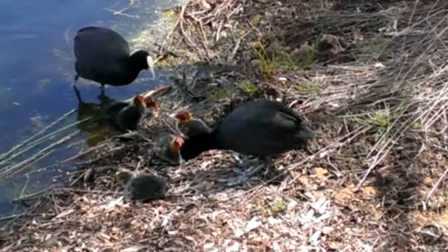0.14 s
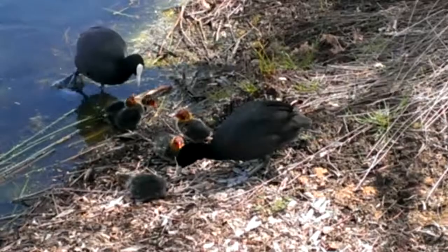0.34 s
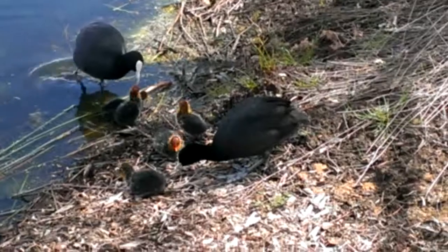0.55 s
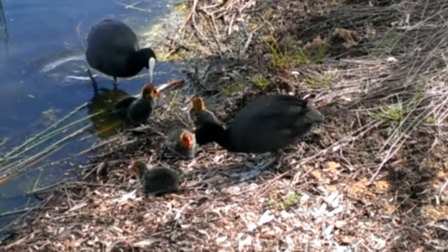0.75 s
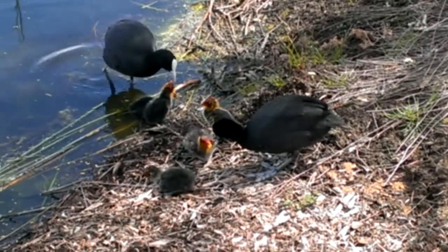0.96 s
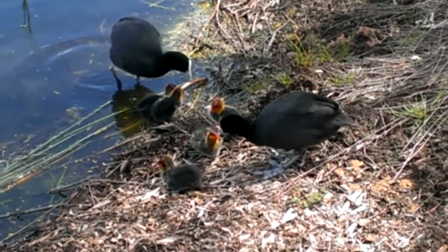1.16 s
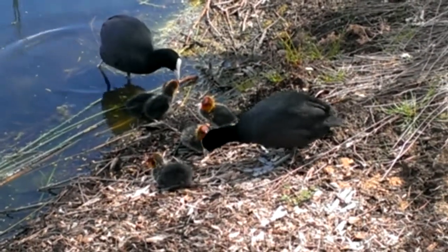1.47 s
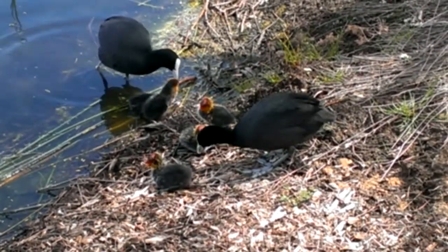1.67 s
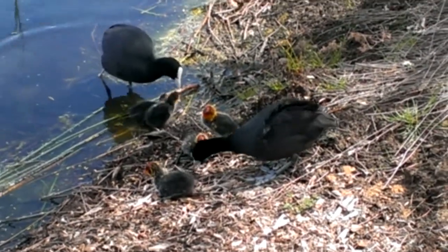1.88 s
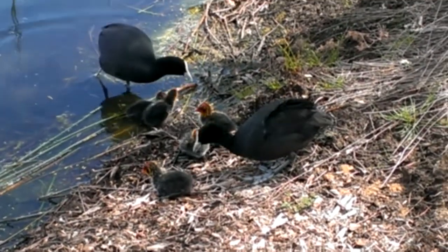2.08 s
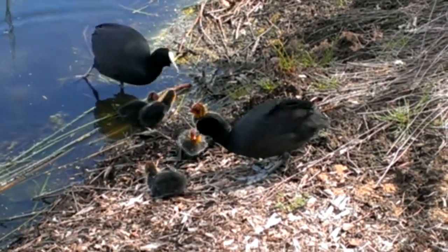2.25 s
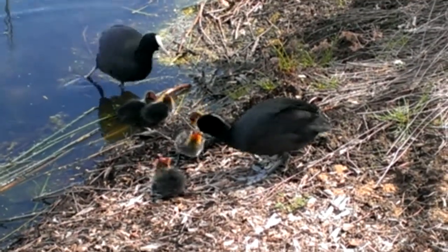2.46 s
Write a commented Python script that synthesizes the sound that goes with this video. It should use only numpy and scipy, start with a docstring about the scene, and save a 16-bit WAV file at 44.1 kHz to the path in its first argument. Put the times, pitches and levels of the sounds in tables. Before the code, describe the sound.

Coot chicks beg at a pond edge: a rough, wavering, nasal squeal at about 0.3-0.5 s and a cleaner one from 2.4 s to the end. After 0.1 s of silence, low wind buffets thump the stereo microphone, easing around 0.4-1.0 s, then returning. Dry stalks crackle brightly on the left, loudest at 0.4-1.0 s, with sparse faint ticks afterwards. Faint outdoor hiss lies underneath.

```python
"""Chicks begging at a windy pond

Coot chicks beg with short wavering squeals: stacks of harmonics coloured by throat and beak.
Dry stalks crackle to the left: ringing ticks and snaps over a swish of noise.
Wind buffets the two microphone ports in low lumps: noise bands that reach higher in a stronger push.
A faint outdoor hiss of coloured noise lies underneath."""
import sys
import numpy as np
from scipy import signal
from scipy.fft import rfft, irfft
from scipy.io import wavfile
from scipy.ndimage import uniform_filter1d

SR = 44100
rng = np.random.default_rng(int(sys.argv[2]) if len(sys.argv) > 2 else 0)


def file_out(sig):
    """Save sig as 16-bit WAV at sys.argv[1]."""
    # one column per channel
    cols = np.atleast_2d(sig).T
    # limit, then scale
    lim = np.clip(cols, -1, 1)
    pcm = np.round(lim * 32767).astype(np.int16)
    wavfile.write(sys.argv[1], SR, pcm)


N = 115542  # length in samples


def amp(db):
    """Turn decibels into a gain."""
    return 10 ** (np.asarray(db) / 20)


def unit(x):
    """Scale a sound to an rms of 1."""
    return x / np.sqrt(np.mean(x ** 2) + 1e-20)


def in_time(rows):
    """Read a table at every sample: straight lines join its rows, one curve per column."""
    s, *columns = np.transpose(rows)
    return [np.interp(np.arange(N) / SR, s, c) for c in columns]


def at_hz(points, hz):
    """Read a spectrum table at any frequency, along a logarithmic frequency scale."""
    table_hz, values = np.array(points).T
    return np.interp(np.log(hz), np.log(table_hz), values)


def drift(rate):
    """Slow random wandering around 0 with a spread of about 1; a higher rate [Hz] wanders faster."""
    step = 20  # samples between the computed points
    r = np.exp(-2 * np.pi * rate * step / SR)
    noise = rng.standard_normal(N // step + 1002)
    slow = signal.lfilter([1], [1, -2 * r, r * r], noise)[1000:]  # skip the filter's start
    return np.interp(np.arange(N) / step, np.arange(len(slow)), unit(slow))


def sides(pan_db):
    """Split a left-minus-right difference in dB into a left and a right level."""
    return np.array([pan_db / 2, -pan_db / 2]).reshape(2, -1)


def pair(likeness):
    """Stereo white noise: the sides are unrelated at likeness 0 and the same at 1."""
    mid, side = rng.standard_normal((2, N))
    c = np.clip(likeness, 0, 1)
    return (np.sqrt(1 + c) * mid + np.sqrt(1 - c) * side * [[1], [-1]]) / np.sqrt(2)


def colour(x, points):
    """Filter a sound by the levels of a spectrum table."""
    hz = np.maximum(np.arange(N // 2 + 1) * SR / N, 1)
    return irfft(rfft(x) * amp(at_hz(points, hz)), N)


def ring(clicks, hz, cycles):
    """Soft bursts: each click passes two short resonances; each loses 60 dB in the given cycles."""
    r, w = amp(-60 * hz / (cycles * SR)), 2 * np.pi * hz / SR
    a = [1, -2 * r * np.cos(w), r * r]
    once = signal.lfilter([0, np.sin(w)], a, clicks + 1e-18)
    return signal.lfilter([(1 - r) * np.e, 0, -(1 - r) * np.e], a, once)


def air():
    """Faint wide hiss of the open pond: coloured noise, only partly alike on the two sides."""
    # level of the hiss: (time [s], level [dB])
    air_level = [(.14, -46.5), (.34, -47), (.4, -40.5), (1.05, -42.5), (1.2, -53), (2.4, -57.5)]
    # hiss spectrum: (frequency [Hz], relative level [dB per Hz])
    air_colour = [(300, 15.5), (700, 17), (1500, 11), (2500, 9.5), (4000, 6.5), (16000, -0.5)]
    db, = in_time(air_level)
    return amp(db) * unit(colour(pair(0.39), air_colour))


def wind():
    """Lumpy pressure at each port; the stronger the push, the higher the edge of its rumble."""
    # wind strength before the lumps: (time [s], level [dB], left minus right [dB])
    gust = [(.12, -26, -2), (.33, -25, -10), (.44, -32.5, 5), (.64, -38, 1), (.9, -35.5, -6.5),
            (1.2, -24.5, -2.5), (1.6, -30.5, -8.5), (2.0, -25, -11), (2.33, -27.5, -6), (2.46, -44, 11.5),
            (2.62, -27, -0.5)]
    # strong buffets before their flutter:
    # (start [s], level [dB], left minus right [dB], time from start until the fall begins [s])
    buffets = [(0.128, -18.5, 4, 0.02), (0.16, -17.5, -2.5, 0.025), (0.225, -20, -9.5, 0.029),
               (0.268, -11.5, -11, 0.022), (0.294, -14.5, -7, 0.025), (0.332, -22.5, -7, 0.02),
               (0.705, -29, -10, 0.045), (0.852, -23.5, -11, 0.021), (1.075, -17, -5, 0.037),
               (1.157, -14.5, 2.5, 0.021), (1.186, -24, -0.5, 0.042), (1.35, -21.5, 3, 0.033),
               (1.453, -21.5, -11, 0.034), (1.566, -22, -12.5, 0.014), (1.674, -24, -12, 0.018),
               (1.777, -20.5, -7.5, 0.019), (1.902, -17, -5.5, 0.033), (2.007, -19.5, 0.5, 0.017),
               (2.046, -21.5, 1, 0.036), (2.129, -19.5, 8, 0.017), (2.183, -17.5, 11, 0.036),
               (2.226, -20, -5.5, 0.051), (2.289, -23, -12.5, 0.057), (2.346, -17.5, -3.5, 0.022),
               (2.401, -25.5, 5.5, 0.039), (2.563, -24, 8, 0.022)]
    # sharp knocks: (time [s], jump of the edge [octaves])
    knocks = [(0.17, 1.3), (0.272, 0.88), (.296, 1.14), (1.166, 0.48), (1.786, 0.27), (1.916, 0.73),
              (2.058, 0.89), (2.139, 0.61), (2.27, 0.81), (2.299, 0.57), (2.34, 0.78)]
    # spectrum below the edge: (frequency [Hz], relative level [dB per Hz])
    wind_colour = [(50, -24), (80, -23.5), (120, -0.5), (180, 4), (300, -2.5), (600, -10.5), (1500, -18),
                   (3000, -27)]
    # how alike the two sides are: (frequency [Hz], likeness [0 to 1])
    wind_likeness = [(30, 0.17), (150, 0.56), (1000, 0.9)]
    lump_db, lumps_per_s, buffet_lump_db = 3.5, 38.4, 2.5
    buffet_rise_s, knock_s = 0.00385, 0.0045
    edge_hz, edge_at_db = 312.6, -25.5  # the edge lies at edge_hz when the push is edge_at_db
    db_per_octave_of_edge, fall_db_per_octave = 12, 67
    # hard pushes carry less deep bass: dB per octave below the hump and per octave of edge rise
    bass_loss_db, hump_hz = 2.5, 169
    even_s, even_share = 0.0115, 0.57  # window and share of the loudness evening

    t = np.arange(N) / SR
    db, pan_db = in_time(gust)
    shared = drift(lumps_per_s)
    lumps = np.array([shared + drift(lumps_per_s) for _ in range(2)]) / np.sqrt(2)
    flutter = drift(70.3)
    push = amp(db + sides(pan_db) + lump_db * lumps)
    for s, peak_db, hit_pan_db, until_fall in buffets:
        rise = (t - s) / buffet_rise_s
        fall = 1 + (s + until_fall - t) / (2 * buffet_rise_s)
        shape = np.clip(np.minimum(rise, fall), 0, 1)
        hit = amp(peak_db + sides(hit_pan_db) + buffet_lump_db * flutter) * shape
        push = np.maximum(push, hit)

    # the edge is counted in octaves above 1 Hz
    edge = np.log2(edge_hz) + (20 * np.log10(push) - edge_at_db) / db_per_octave_of_edge
    edge = edge + sum(octaves * np.exp(-((t - s) / knock_s) ** 2) for s, octaves in knocks)
    white = rng.standard_normal((2, 2, N))
    band_edges = 25 * 2 ** np.arange(0, 7.1, 1 / 3)  # thirds of an octave from 25 Hz
    out, power = 0, 0
    for k, (low, high) in enumerate(zip(band_edges, band_edges[1:])):
        hz = np.sqrt(low * high)
        band_pass = signal.butter(4, [low, high], "band", fs=SR, output="sos")
        mid, side = signal.sosfilt(band_pass, white[k % 2])  # neighbours use different noise
        alike = np.clip(at_hz(wind_likeness, hz), 0, 1)
        band = np.sqrt(1 + alike) * mid + np.sqrt(1 - alike) * side * [[1], [-1]]
        fall_db = fall_db_per_octave * np.maximum(np.log2(hz) - edge, 0)
        thin_db = bass_loss_db * max(np.log2(hump_hz / hz), 0) * (edge - np.log2(edge_hz))
        gain = amp(at_hz(wind_colour, hz) - fall_db - thin_db)
        out = out + gain * band
        power = power + gain ** 2 * np.mean(band ** 2)
    out = out / np.sqrt(power)  # so that the push alone sets the level
    loudness = uniform_filter1d(out ** 2, int(even_s * SR))
    return push * out / loudness ** (even_share / 2)


def stalks():
    """Dry stalks: clumped ringing ticks at scattered pitches over a swish, and the loudest snaps."""
    # level of ticks and swish together: (time [s], level [dB])
    rustle_level = [(.14, -43), (.33, -43.5), (.4, -31.5), (.6, -34), (.64, -48), (.72, -31), (1.03, -34.5),
                    (1.1, -44.5), (1.19, -48.5), (1.25, -40), (1.33, -45), (1.38, -41), (1.44, -48.5),
                    (1.5, -42), (1.61, -48.5), (1.65, -44), (1.77, -40.5), (1.83, -55.5), (1.872, -43.5),
                    (1.91, -55), (2.035, -43), (2.09, -53.5), (2.2, -42.5), (2.285, -54.5), (2.32, -46),
                    (2.46, -41.5), (2.62, -41.5)]
    # loudest snaps: (time [s], peak level before panning [dB])
    snaps = [(0.428, -15.5), (0.4847, -11), (0.5289, -11.5), (0.5561, -17.5), (0.569, -11.5),
             (0.5906, -14.5), (0.7482, -24), (0.7732, -8), (0.8854, -19.5), (0.9388, -20), (1.0178, -16),
             (1.3634, -26.5), (1.5527, -27.5), (1.7307, -19.5), (2.0336, -23.5), (2.1135, -24),
             (2.159, -26)]
    # spectrum of ticks and swish: (frequency [Hz], relative level [dB per Hz])
    rustle = [(1500, -19), (2500, -27), (3640, -20), (6610, 3.5), (7920, -0.5), (10800, -10), (15100, -12),
              (16300, -3.5)]
    # gain of the top treble of ticks and swish: (time [s], level [dB])
    treble = [(.3, -9), (.42, -6.5), (.6, -9.5), (.66, -11), (1.2, -9), (1.4, 1.5)]
    ticks_per_s, tick_spread_db, tick_cycles = 2000, 4.5, 6.45  # the rate is before clumping
    tick_db, swish_db, clump_db = -1, 2, 5
    stalk_pan_db, stalk_likeness, treble_hz = 8.5, 0.22, 8150
    snap_s, snap_hz, snap_ring_cycles, snap_crack_share = .001, 6940, 8, .28

    (db,), (treble_db,) = in_time(rustle_level), in_time(treble)
    sizes = amp(tick_spread_db * np.minimum(rng.exponential(1, N), 3)) * rng.choice([-1, 1], N)
    born = rng.random(N) < ticks_per_s * amp(clump_db * drift(15)) / SR
    pans = rng.normal(0, 3.1, N)  # left minus right in dB
    clicks = sizes * born * amp(sides(pans))
    dealt = rng.integers(0, 16, N)  # which of 16 pitches a click gets
    ticks = 0
    for k, hz in enumerate(np.geomspace(3000, 15500, 16)):
        ticks = ticks + amp(at_hz(rustle, hz)) * ring(clicks * (dealt == k), hz, tick_cycles)
    swish = colour(pair(stalk_likeness), rustle) * amp(clump_db / 2 * drift(18.0))
    out = amp(tick_db) * unit(ticks) + amp(swish_db) * unit(swish)
    low = signal.sosfiltfilt(signal.butter(3, treble_hz, fs=SR, output="sos"), out)
    out = amp(db) * (low + amp(treble_db) * (out - low))

    after = np.arange(400) / (snap_s * SR)  # time since the snap, in units of snap_s
    for s, peak_db in snaps:
        i = int(s * SR)
        # fibres part in a short spurt of noise
        split = rng.standard_normal(400) * after * np.exp(-2 * after)
        crack = unit(np.diff(split, prepend=0))
        burst = unit(ring(split, snap_hz, snap_ring_cycles)) + snap_crack_share * crack
        out[:, i:i + 400] += amp(peak_db) * burst / np.abs(burst).max()
    return out * amp(sides(stalk_pan_db))


def chicks():
    """Harmonics of a wavering pitch; throat and beak set each one's level, and a rasp roughens it."""
    # one table per squeal: (time [s], pitch before the wobble [Hz], level before throat and pan [dB])
    squeals = [
        [(.3, 790, -49), (.36, 819.5, -38), (.378, 718, -35), (.392, 689, -34.5), (.418, 849.4, -35.5),
         (.43, 840, -31.5), (.444, 730, -34), (.455, 713, -34), (.466, 771, -39.5), (.49, 774, -31),
         (.504, 835, -31.5), (.516, 848, -34), (.524, 764, -41)],
        [(2.42, 795, -43), (2.466, 860, -42.5), (2.482, 812, -37), (2.5, 717, -45.5), (2.516, 694, -38),
         (2.528, 841, -33.5), (2.544, 839, -33.5), (2.564, 840, -34), (2.576, 734, -37.5), (2.59, 760, -43.5),
         (2.62, 800, -37)],
    ]
    # colour of throat and beak: (frequency [Hz], level [dB])
    throat = [(800, -9), (1400, -14), (1700, -0.5), (2000, -2.5), (2500, 2), (2880, 2.5), (3500, -12),
              (4200, 1), (5000, -2.5), (5900, -1.5), (6800, -1.5), (8000, -15), (11000, -68)]
    # rasp of each squeal, the second one cleaner: [dB per octave above the pitch]
    rasps = [2.0, .9]
    rasp_per_s, wobble = 200, 0.00727  # wobble as a share of the pitch
    dull_db_per_octave_per_db = 0.25  # quiet parts of a squeal are duller
    squeal_pan_db, fade_s = 3, 0.0026

    out, t = np.zeros((2, N)), np.arange(N) / SR
    for call, rasp_db in zip(squeals, rasps):
        hz, db = in_time(call)
        hz = uniform_filter1d(hz, size=200) * (1 + wobble * drift(42.3))
        phase = 2 * np.pi * np.cumsum(hz) / SR
        start, end = call[0][0], call[-1][0]
        gate = np.clip(np.minimum(t - start, end + fade_s - t) / fade_s, 0, 1)
        stack = 0
        for k in range(1, 13):
            octaves = np.log2(k)
            dull_db = dull_db_per_octave_per_db * octaves * (db - db.max())
            rough_db = rasp_db * octaves * drift(rasp_per_s)
            # each side starts the harmonic at a somewhat different phase
            offset = rng.uniform(0, 2 * np.pi) + rng.normal(0, 0.93, (2, 1))
            stack = stack + amp(at_hz(throat, k * hz) + dull_db + rough_db) * np.sin(k * phase + offset)
        out += gate * amp(db) * stack
    return out * amp(sides(squeal_pan_db))


def scene():
    """All sources together."""
    return air() + wind() + stalks() + chicks()


def record(dry):
    """Peaks are rounded, bass and top cut; sound begins after a short silence."""
    start_s, top = .115, 0.66  # top: the level that rounded peaks cannot pass
    bass_cut_hz, cutoff_hz = 63.6, 16200  # from cutoff_hz up, at least 70 dB are lost
    on = np.clip((np.arange(N) / SR - start_s) / 0.0012, 0, 1)
    rounded = top * np.tanh(dry / top)
    thin = signal.sosfilt(signal.butter(4, bass_cut_hz, "high", fs=SR, output="sos"), rounded) * on
    return signal.sosfilt(signal.cheby2(20, 70, cutoff_hz, fs=SR, output="sos"), thin)


dry = scene()
out = record(dry)
file_out(out)
```